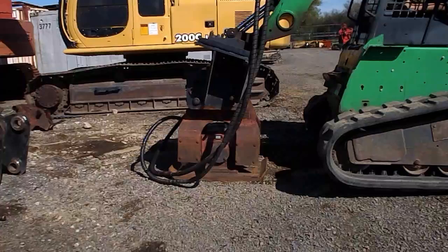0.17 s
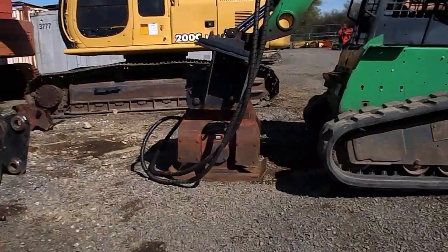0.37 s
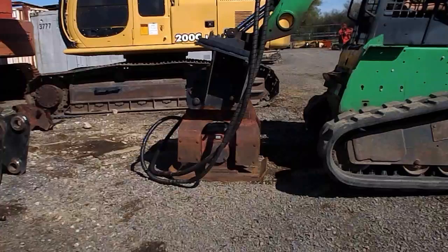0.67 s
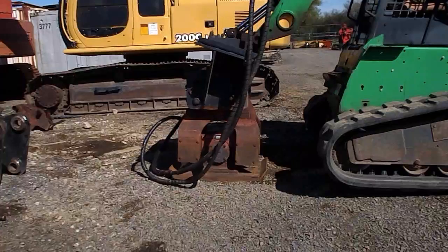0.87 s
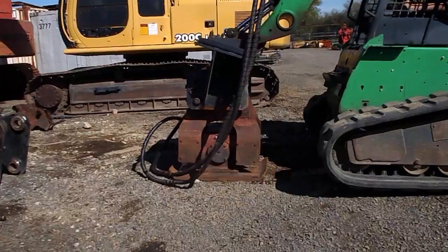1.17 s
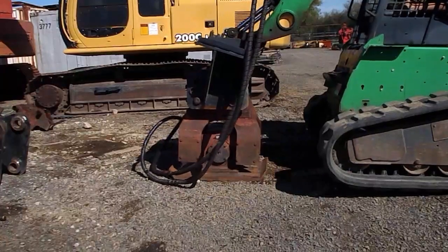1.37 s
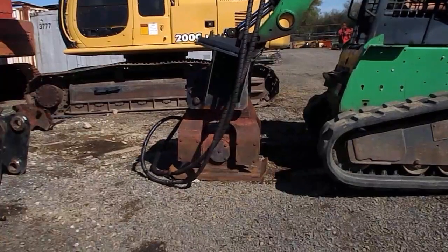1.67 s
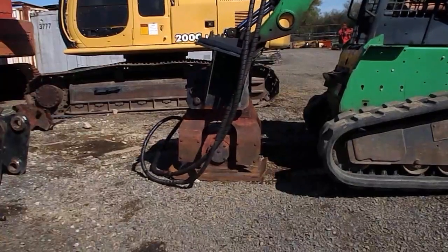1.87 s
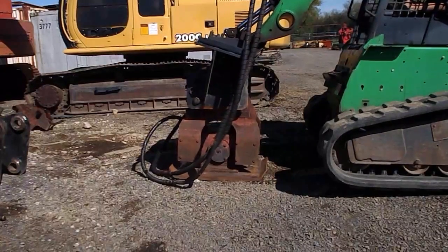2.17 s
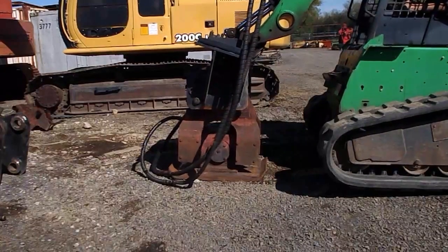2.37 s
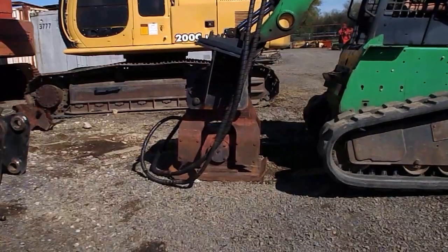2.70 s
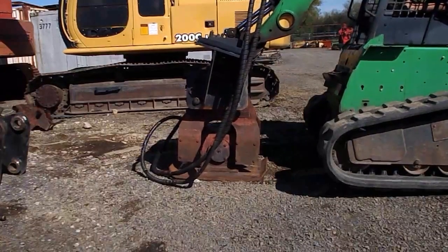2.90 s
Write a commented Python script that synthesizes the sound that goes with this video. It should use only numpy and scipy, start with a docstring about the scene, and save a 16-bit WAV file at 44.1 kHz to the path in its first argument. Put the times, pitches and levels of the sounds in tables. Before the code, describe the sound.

First a tracked loader's diesel throbs and whines steadily; then its plate compactor kicks in with hard blows, fast shuddering rattle, gravel grit and wavering low boom, close microphone, outdoors, with only short scattered echoes.

```python
"""The throbbing four-cylinder diesel of a tracked loader is heard first, in a gravel yard: phase-locked exhaust
tones, whines, repeating combustion knock and fan noise. After a second it takes up the load of a hydraulic
plate compactor and sags a little. An eccentric weight shakes the plate about 22 times a second: random impacts,
swelling and fading with the turns, make rattle, rumble and grit; noise bursts make clanks and hard blows,
and a wavering sine is the boom of the housing as the plate beds in. Scattered echoes follow the compactor."""
import sys
import numpy as np
from scipy import signal
from scipy.fft import rfft, irfft
from scipy.io import wavfile
from scipy.ndimage import uniform_filter1d

SR = 44100
rng = np.random.default_rng(int(sys.argv[2]) if len(sys.argv) > 2 else 0)


def unload_wav(signal):
    """Save mono or channel-first audio to the path in sys.argv[1] as 16-bit WAV at rate SR, clipped to [-1, 1]."""
    wavfile.write(
        sys.argv[1],
        SR,
        np.round(np.clip(np.atleast_2d(signal).T, -1, 1) * 32767).astype(np.int16),
    )


N = 134064
T = np.arange(N) / SR  # time in seconds


def amp(db):
    """Logarithmic level: converts decibels to an amplitude gain."""
    return 10 ** (np.asarray(db) / 20)


def unit(x):
    """Normalisation: scales a signal to an rms of 1."""
    return x / np.sqrt(np.mean(x ** 2) + 1e-20)


def curve(rows):
    """Linear interpolation: joins each column of a table by straight lines over time, holding the end values."""
    seconds, *columns = np.transpose(rows)
    return [np.interp(T, seconds, column) for column in columns]


def colour(x, points):
    """Linear filtering: multiplies the spectrum of x by a curve of dB over log frequency, then sets rms 1."""
    hz, db = np.transpose(points)
    f = np.fft.rfftfreq(2 * N, 1 / SR)
    gain = amp(np.interp(np.log(f + 1), np.log(hz), db))
    gain = gain * f / (f + hz[0] / 2)  # fades out towards 0 Hz
    return unit(irfft(rfft(x, 2 * N) * gain)[:N])  # zero padding keeps the end off the start


def resonate(x, hz, width):
    """Damped resonance: shifts x down by hz, smooths it with a one-pole filter and shifts it back up."""
    turn = np.exp(2j * np.pi * np.cumsum(hz * np.ones(N)) / SR)
    decay = np.exp(-np.pi * width / SR)
    return 2 * (turn * signal.lfilter([1 - decay], [1, -decay], x / turn)).real


def slow_noise(width):
    """Narrow-band modulation: random wavering around 0 Hz, at rms 1."""
    return unit(resonate(rng.standard_normal(N), 0, width))


# Speed of the engine. Each row: time in seconds, firing rate in firings per second.
ENGINE_SPEED = [(0, 48.1), (1.05, 48.1), (1.18, 45.3), (1.5, 46.2), (3.04, 46)]
# Exhaust harmonics. Each row: multiple of the firing rate, rms level in dB before the load.
EXHAUST_TONES = [(1, -42), (2, -27), (3, -38), (3.25, -42.5), (3.5, -40), (3.75, -37), (4, -33.5),
                 (4.5, -39.5), (6, -42.5), (6.5, -41)]
# Whines of pump, belt and gears. Each row: multiple of the firing rate, rms level in dB before the load.
WHINE_TONES = [(11, -34), (12, -37), (13.62, -36), (14.75, -42.5), (15.5, -40.5), (19, -43.5),
               (20.4, -50.5), (33, -42), (37.5, -40), (68, -42.5)]
LOADED_TONES_DB, LOAD_S, LOAD_RAMP_S = -8, 1.08, 0.13
THROB_LAG, PIPE_SPREAD = -0.11, 0.14  # delay in firings; phase spread in cycles
WHINE_WAVER, WHINE_WAVER_HZ = 0.38, 5.2  # rms phase in radians; bandwidth


def engine_tones(firings, cylinder_count):
    """Harmonic synthesis: phase-aligned exhaust tones add to a throb, whines follow, and all drop under load."""
    tones = 0
    for multiple, db in EXHAUST_TONES:
        spread = PIPE_SPREAD * (multiple - cylinder_count) ** 2
        cycles = multiple * (firings - THROB_LAG) - spread
        tones = tones + amp(db) * np.cos(2 * np.pi * cycles)
    for multiple, db in WHINE_TONES:
        waver = WHINE_WAVER * slow_noise(WHINE_WAVER_HZ)
        cycles = multiple * firings + rng.random()
        tones = tones + amp(db) * np.cos(2 * np.pi * cycles + waver)
    load = np.clip((T - LOAD_S) / LOAD_RAMP_S, 0, 1)
    return np.sqrt(2) * tones * amp(LOADED_TONES_DB * load)


# Knock of each cylinder. Each row: place in the engine cycle from 0 to 1, relative level in dB.
CYLINDER_KNOCKS = [(.01, -1.5), (0.264, 0.5), (0.478, -7.5), (.74, -11)]
# Spectrum of the knock. Each row: frequency in Hz, relative density in dB per Hz.
KNOCK_SPECTRUM = [(110, -35.5), (170, -20), (260, -6), (360, 1.5), (430, -5.5), (510, 0.5), (720, 0),
                  (900, -8), (1750, -7), (2500, -12), (3300, -11), (4500, -24.5), (7000, -50.5)]
KNOCK_DECAY_S, KNOCK_BETWEEN, KNOCK_DB = 0.008, 0.91, -28.5  # between: relative gain under the blows


def knock(firings, start_rate):
    """Cyclic excitation: one fixed noise pattern repeats every four firings, swelling at each cylinder's blow."""
    cycle = firings / len(CYLINDER_KNOCKS) % 1
    cycle_s = len(CYLINDER_KNOCKS) / start_rate
    blows = KNOCK_BETWEEN
    for place, db in CYLINDER_KNOCKS:
        age_s = ((cycle - place) % 1) * cycle_s
        blows = blows + amp(db) * np.exp(-age_s / KNOCK_DECAY_S)
    pattern = irfft(np.exp(2j * np.pi * rng.random(1835)))  # flat spectrum, random phases
    repeated = pattern[(cycle * len(pattern)).astype(int)]
    return amp(KNOCK_DB) * colour(blows * repeated, KNOCK_SPECTRUM)


# Spectrum of the fan. Each row: frequency in Hz, relative density in dB per Hz.
FAN_SPECTRUM = [(20, -20), (70, -7.5), (115, -11), (170, -3), (260, -4), (560, 0.5), (900, -7.5),
                (1800, -5.5), (2700, -9.5), (3350, -7.5), (3750, -15.5), (5000, -19.5), (5900, -26),
                (6900, -48.5), (9300, -48)]
FAN_DB, FAN_PULSE = -27, 0.22  # pulse: depth of the swing in gain


def fan(firings):
    """Amplitude modulation: broadband fan rush pulses once a firing."""
    pulse = 1 + FAN_PULSE * np.cos(2 * np.pi * firings)
    return amp(FAN_DB) * colour(rng.standard_normal(N) * pulse, FAN_SPECTRUM)


def engine():
    """Phase coherence: tones, knock and fan all follow one running count of firings."""
    rate, = curve(ENGINE_SPEED)
    firings = np.cumsum(rate) / SR
    return engine_tones(firings, len(CYLINDER_KNOCKS)) + knock(firings, rate[0]) + fan(firings)


# Speed of the eccentric weight. Each row: time in seconds, turns per second.
WEIGHT_SPEED = [(1.2, 23), (1.46, 22.8), (1.56, 19.3), (1.88, 20.3), (2.0, 24), (2.2, 22.2), (2.4, 21.3),
                (3.04, 22)]
FIRST_BLOW_S = 1.197


def beat(lag):
    """Forced vibration: swings from +1 at each blow of the plate to -1 between; lag is in turns."""
    turns = np.cumsum(curve(WEIGHT_SPEED)[0]) / SR
    first_blow = np.interp(FIRST_BLOW_S, T, turns)
    return np.cos(2 * np.pi * (turns - first_blow - lag))


CONTACTS_PER_S, CONTACT_SPREAD_DB = 7000, 3


def contacts():
    """Poisson-like excitation: a dense random train of tiny impacts, a few of them large."""
    size = amp(CONTACT_SPREAD_DB * np.minimum(rng.exponential(1, N), 4))
    sign = rng.choice([-1., 1.], N)
    struck = rng.random(N) < CONTACTS_PER_S / SR
    return unit(size * sign * struck)


PATCH_DB, PATCH_HZ, PATCH_S = 2, 450, .02  # rms change, height and length of a patch


def wander(x, size=256):
    """Time-varying filtering: the points of contact wander, so parts of the spectrum flare up and fade."""
    frames = signal.stft(x, nperseg=size)[2]
    bins = max(1, round(PATCH_HZ * size / SR))
    steps = max(1, round(2 * PATCH_S * SR / size))  # frames overlap by half
    field = uniform_filter1d(rng.standard_normal(frames.shape), bins, axis=0)
    field = uniform_filter1d(field, steps, axis=1)
    return unit(signal.istft(frames * amp(PATCH_DB * unit(field)), nperseg=size)[1][:N])


# Rattle of the plate. Each row: time in seconds, level in dB midway through the beat,
# depth of the beat in dB (negative is louder between blows).
RATTLE_LEVEL = [(1.0, -37, -5), (1.2, -27, 3), (1.29, -21.5, 4), (1.39, -28, 8.5), (1.52, -23, 1),
                (1.66, -23, 2.5), (1.74, -27, 2), (1.82, -22, 2.5), (1.91, -20.5, 1), (2.03, -23.5, 4),
                (2.12, -22, 4.5), (2.28, -21, 4.5), (2.45, -22.5, 2.5), (2.55, -22.5, -1), (2.7, -22, 2.5),
                (2.82, -23.5, 3), (3.04, -20, -3.5)]
# Spectrum of the plate. Each row: frequency in Hz, relative density in dB per Hz.
PLATE_SPECTRUM = [(30, -40.5), (65, -18), (110, -2), (200, -2.5), (350, -0.5), (650, -4), (1000, -1),
                  (1400, -5), (1900, -14), (3000, -12), (5000, -23.5), (7000, -62.5)]


def rattle():
    """Impact noise: each turn modulates a cluster of impacts between plate and gravel."""
    level, depth = curve(RATTLE_LEVEL)
    return wander(colour(contacts(), PLATE_SPECTRUM)) * amp(level + depth * beat(0))


# Low rumble of the plate on the ground. Each row: time in seconds, level in dB midway through the beat.
RUMBLE_LEVEL = [(1.05, -47), (1.19, -23.5), (1.35, -29), (1.45, -29), (1.62, -30.5), (1.8, -30),
                (1.92, -37), (2.02, -24), (2.08, -21), (2.11, -29), (2.2, -31.5), (2.45, -38.5),
                (2.6, -26.5), (3.04, -45)]
# Spectrum of the ground. Each row: frequency in Hz, relative density in dB per Hz.
GROUND_SPECTRUM = [(35, -32.5), (62, -16.5), (85, 0), (115, 4), (190, 1.5), (290, 2), (450, -14),
                   (900, -55.5)]
RUMBLE_BEAT_DB = 1.5


def rumble():
    """Low-frequency radiation: the ground answers the impacts with a rumble that pulses with the turns."""
    level = curve(RUMBLE_LEVEL)[0] + RUMBLE_BEAT_DB * beat(0)
    return colour(contacts(), GROUND_SPECTRUM) * amp(level)


# Shared envelope of gravel and frame. Each row: time in seconds, gain in dB midway through the beat.
GRINDING_LEVEL = [(1.0, -37), (1.205, -33.5), (1.234, -22.5), (1.255, -27.5), (1.37, -27), (1.40, -28.5),
                  (1.45, -25.5), (1.52, -33), (1.555, -22), (1.585, -28), (1.61, -22.5), (1.69, -23.5),
                  (1.73, -24.5), (1.82, -24), (1.95, -22.5), (2.03, -28.5), (2.075, -25), (2.125, -27),
                  (2.165, -23), (2.215, -22.5), (2.29, -24), (2.33, -28), (2.386, -22.5), (2.45, -26),
                  (2.5, -25.5), (2.58, -21.5), (2.66, -28.5), (2.74, -26.5), (2.79, -23), (3.04, -25.5)]
# Spectrum of the gravel. Each row: frequency in Hz, relative density in dB per Hz.
GRAVEL_SPECTRUM = [(500, -13), (1500, -7.5), (2400, 2), (3200, 2), (4200, -0.5), (5100, -1.5), (5900, -6),
                   (6500, -15), (7000, -37.5), (7800, -17.5), (9300, -62)]
# Resonances of the steel frame. Each row: frequency in Hz, bandwidth in Hz, relative level in dB.
FRAME_MODES = [(810, 20, -21), (923, 13, -9), (1110, 27, -18.5), (1430, 25, -21.5), (2410, 27, -6),
               (2830, 39, -10), (3890, 22, -3.5), (4740, 39, -12.5)]
GRIT_DB, STEEL_DB = -0.5, -13.5  # added to the envelope and, for steel, to each mode
GRIT_BEAT_DB, GRIT_LAG = 1.5, 0.043  # lag in turns


def grinding():
    """Modal excitation: gravel grinds in a gritty treble, and impacts of stones ring the frame's modes."""
    level = amp(curve(GRINDING_LEVEL)[0] + GRIT_BEAT_DB * beat(GRIT_LAG))
    stones = contacts()
    ring = sum(amp(db) * unit(resonate(stones, hz, width)) for hz, width, db in FRAME_MODES)
    gravel = wander(colour(contacts(), GRAVEL_SPECTRUM))
    return level * (amp(GRIT_DB) * gravel + amp(STEEL_DB) * ring)


# Boom of the housing. Each row: time in seconds, pitch in Hz, rms level in dB midway through the beat.
BOOM_NOTE = [(1.1, 191.1, -57), (1.33, 194.3, -27), (1.48, 200.3, -44), (1.68, 224, -32), (1.8, 200.9, -38),
             (1.95, 180.9, -30), (2.05, 169.8, -27.5), (2.135, 217, -28), (2.22, 212.3, -37),
             (2.37, 217.6, -30), (2.48, 209.2, -45), (2.55, 219, -26.5), (2.63, 182.4, -29.5),
             (2.7, 216.3, -26.5), (2.78, 225.7, -27.5), (3.04, 228, -28)]
BOOM_WAVER, BOOM_WIDTH_HZ = 0.55, 13  # rms phase in radians; bandwidth
BOOM_BEAT_DB, BOOM_LAG = 3.5, .15  # lag in turns


def housing():
    """Phase and amplitude modulation: a low note of the housing wavers and is pumped by the blows."""
    hz, level = curve(BOOM_NOTE)
    waver = BOOM_WAVER * slow_noise(BOOM_WIDTH_HZ)
    note = np.sin(2 * np.pi * np.cumsum(hz) / SR + waver)
    return np.sqrt(2) * amp(level + BOOM_BEAT_DB * beat(BOOM_LAG)) * note


# Bursts of loose steel. Each row: start of the hold in seconds, level in dB.
CLANK_BURSTS = [(1.107, -33), (1.195, -25), (1.235, -13), (1.280, -23), (1.325, -28.5), (1.554, -24),
                (1.604, -14), (1.660, -18), (1.805, -21.5), (2.08, -19), (2.122, -18.5), (2.165, -26),
                (2.305, -30), (2.397, -25), (2.542, -17), (2.587, -22)]
# Spectrum of struck steel. Each row: frequency in Hz, relative density in dB per Hz.
CLANK_SPECTRUM = [(100, -4), (400, -8.5), (800, 2), (1250, -1), (1800, -6.5), (3000, -6), (5000, -28),
                  (7000, -43)]
CLANK_RISE_S, CLANK_HOLD_S, CLANK_DECAY_S = 0.0087, 0.0022, 0.0088


def clanks():
    """Envelope shaping: loose steel chatters in noise bursts that swell, hold briefly and die exponentially."""
    force = 0
    for start, db in CLANK_BURSTS:
        age = T - start
        rise = (np.minimum(age, 0) / CLANK_RISE_S) ** 2
        decay = np.maximum(age - CLANK_HOLD_S, 0) / CLANK_DECAY_S
        force = force + amp(db) * np.exp(-rise - decay)
    return force * colour(rng.standard_normal(N), CLANK_SPECTRUM)


# Hard blows of steel. Each row: start in seconds, level in dB at the start.
HARD_BLOWS = [(1.106, -19), (1.177, -16.5), (1.231, -12.5), (1.238, -12), (1.357, -16.5), (1.378, -17),
              (1.425, -16), (1.54, -14), (1.604, -13.5), (1.644, -16), (1.756, -15), (1.803, -15.5),
              (2.166, -19.5)]
STRIKE_DECAY_S = 0.0028


def strikes():
    """Impulsive excitation: hard single blows start at once and decay exponentially."""
    force = 0
    for start, db in HARD_BLOWS:
        force = force + amp(db) * (T >= start) * np.exp(-abs(T - start) / STRIKE_DECAY_S)
    return force * colour(rng.standard_normal(N), CLANK_SPECTRUM)


# Hops of the plate. Each row: start in seconds, change of level in dB.
PLATE_HOPS = [(1.379, -3.5), (1.808, -5), (2.085, -8), (2.169, -11.5)]
HOP_S, HOP_LEAVE_S, HOP_LAND_S = 0.037, 0.0017, .012


def grip():
    """Loss of contact: the level drops abruptly when the plate hops clear and returns as it lands."""
    change = 0
    for start, db in PLATE_HOPS:
        leaving = np.clip((T - start) / HOP_LEAVE_S, 0, 1)
        landing = np.clip((start + HOP_S - T) / HOP_LAND_S, 0, 1)
        change = change + db * leaving * landing
    return amp(change)


YARD_DB, YARD_T60_S = -12.5, 0.12  # T60: time to decay by 60 dB


def yard(x):
    """Convolution with sparse reflections: short scattered echoes from the parked machines."""
    t = T[:SR // 2]
    sign = rng.choice([-1., 1.], len(t))
    present = (rng.random(len(t)) < 2000 / SR) * (t > .008)  # 2000 echoes a second, after 8 ms
    taps = sign * present * amp(-60 * t / YARD_T60_S)
    return signal.fftconvolve(x, taps / np.linalg.norm(taps))[:N]


def scene():
    """Superposition: the engine, the compactor and the compactor's echoes add up."""
    in_contact = rattle() + rumble() + grinding() + clanks()
    compactor = grip() * in_contact + strikes() + housing()
    return (engine() + compactor + amp(YARD_DB) * yard(compactor))[None]


HEADROOM, EDGE_HZ = .85, 9400  # amplitude the peaks approach; upper edge of the band


def record(dry):
    """Saturation and band limiting: rounds off the highest peaks, then applies a linear-phase low-pass."""
    rounded = dry / (1 + (dry / HEADROOM) ** 4) ** .25
    lowpass = signal.firwin(511, EDGE_HZ, window=("kaiser", 9), fs=SR)
    return signal.oaconvolve(rounded, lowpass[None], "same")


dry = scene()
out = record(dry)
unload_wav(out)
```